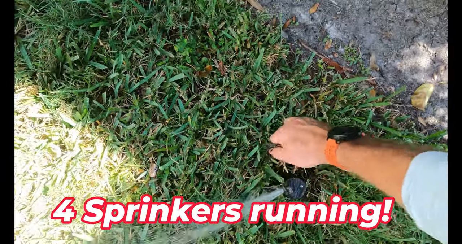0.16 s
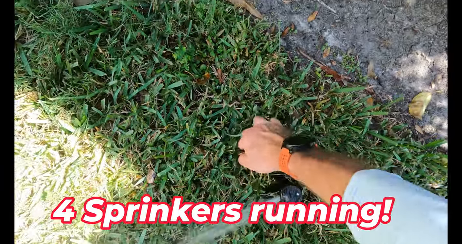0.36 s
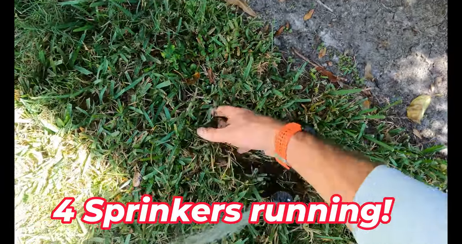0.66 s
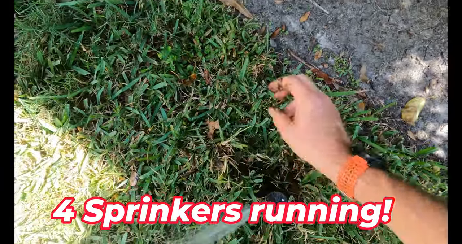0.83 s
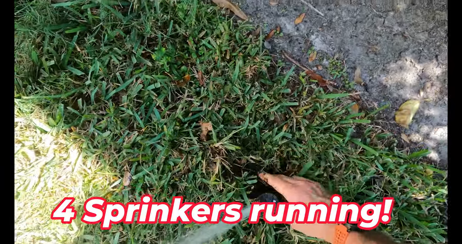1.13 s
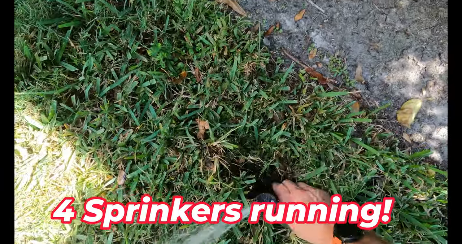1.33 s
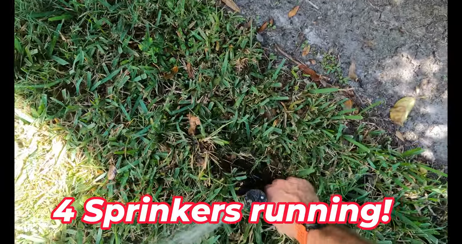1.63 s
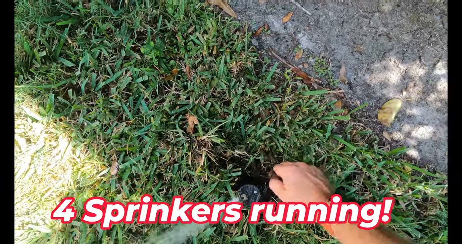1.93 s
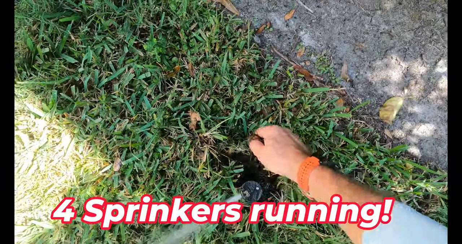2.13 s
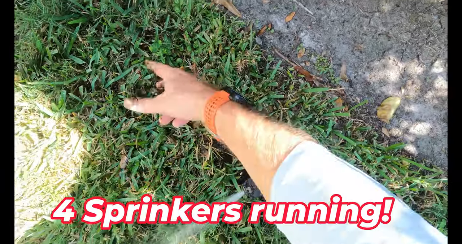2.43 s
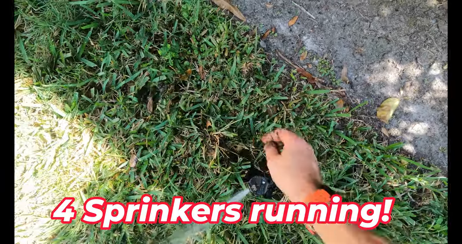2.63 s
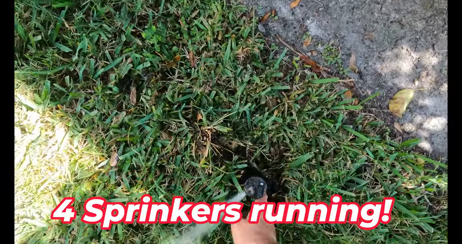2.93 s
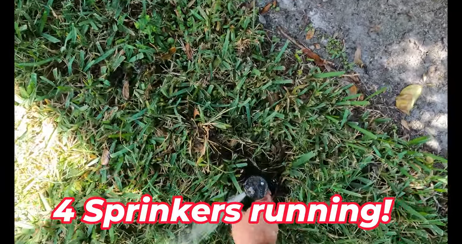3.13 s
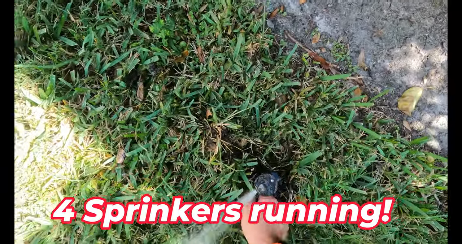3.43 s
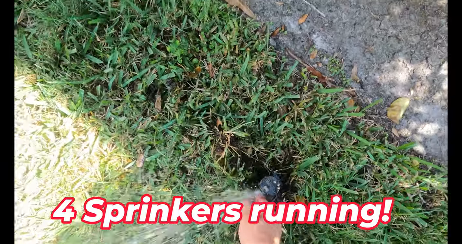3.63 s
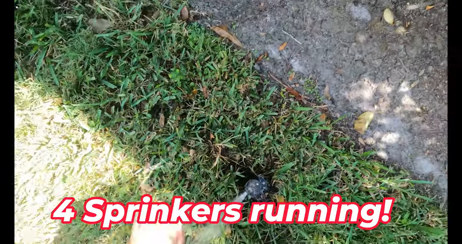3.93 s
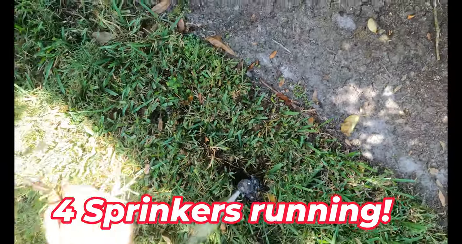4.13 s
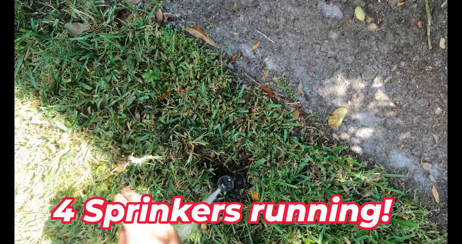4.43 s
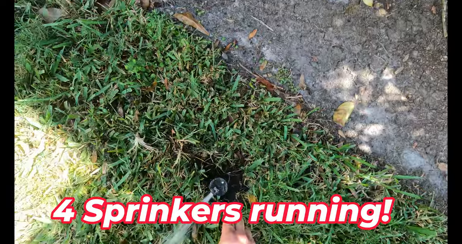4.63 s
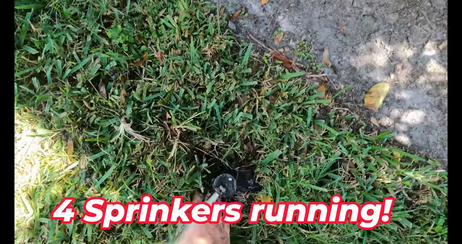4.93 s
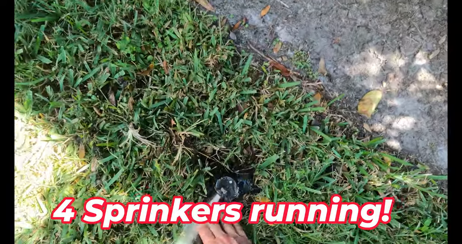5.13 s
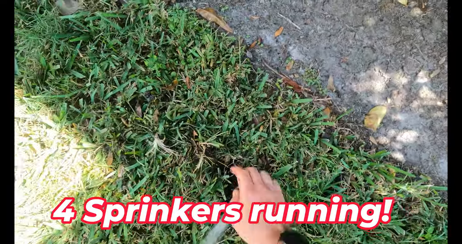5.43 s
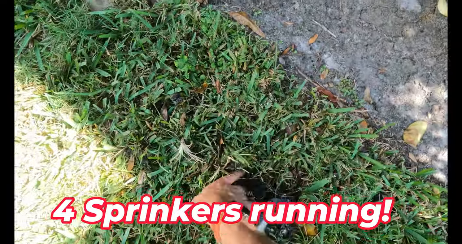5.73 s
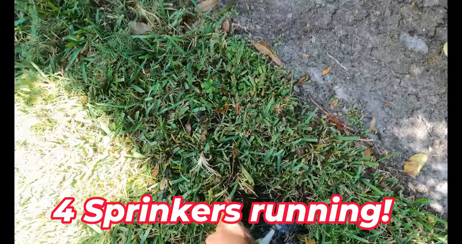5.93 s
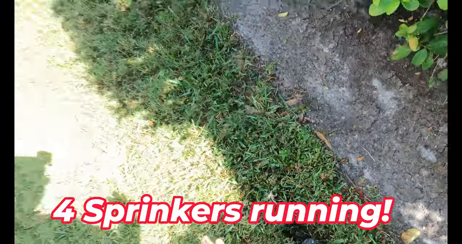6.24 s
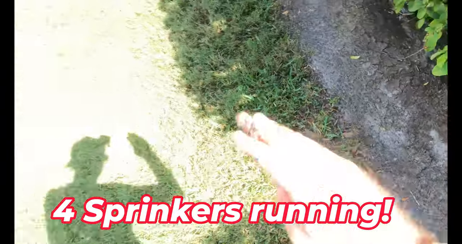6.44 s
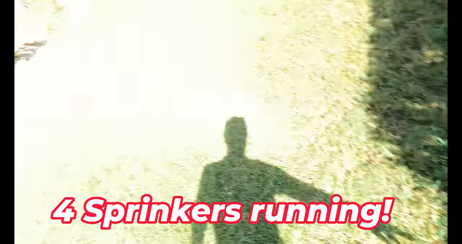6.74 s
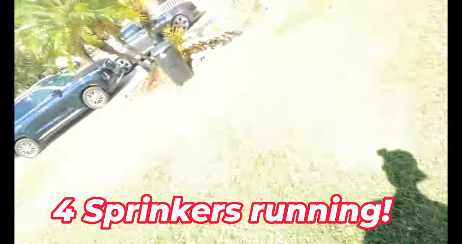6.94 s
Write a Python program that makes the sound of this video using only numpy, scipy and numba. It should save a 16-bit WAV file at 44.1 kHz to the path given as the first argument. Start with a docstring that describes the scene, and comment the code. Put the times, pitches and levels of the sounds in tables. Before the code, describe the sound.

Low traffic rumble and distant motor hum open the scene, with fingers ticking on a plastic sprinkler head and tiny water spits. A bright, crackly spray then bursts out and holds, wavering and splashing on the grass close by. It gulps and falters late, thins away to the soft street murmur, and rushes back just before the cut. Close, open-air microphone without room echo.

```python
"""A pop-up lawn sprinkler spits and then sprays against a hand and the grass, close by.
Dense droplet clicks come in bursts and ring five resonances about 2.4 kHz apart that shift as hand and head move.
Filtered clicks make heavier drops patter underneath; ticks of the plastic head are noise cracks with short rings.
Behind lie a wavering motor hum of sines, a traffic rumble that recedes and a street murmur, both coloured noise."""
import sys
import numpy as np
from scipy import signal
from scipy.fft import rfft, irfft
from scipy.io import wavfile
from scipy.ndimage import uniform_filter1d
from numba import njit

SR = 44100
rng = np.random.default_rng(int(sys.argv[2]) if len(sys.argv) > 2 else 0)


def dump_mix(stems):
    """Bounce the given channels to the path in sys.argv[1] as a 16-bit WAV at rate SR."""
    frames = np.atleast_2d(stems).T  # one column per channel
    limited = np.clip(frames, -1, 1)  # hard clip at full scale
    pcm = np.round(limited * 32767).astype(np.int16)
    wavfile.write(sys.argv[1], SR, pcm)


N = 311742


def undb(db):
    """Decibels to an amplitude factor."""
    return 10 ** (np.asarray(db) / 20)


def level(x, db):
    """Scale a signal to an RMS level in dB."""
    return x * undb(db) / np.sqrt(np.mean(x ** 2))


def curves(table):
    """Columns of a timed table after t/s, one value a sample."""
    s, *columns = np.transpose(table)
    return [np.interp(np.arange(N) / SR, s, column) for column in columns]


def over_hz(table):
    """A spectrum table read at every bin, straight on a log axis."""
    hz, value = np.transpose(table)
    bins_hz = np.arange(N // 2 + 1) * SR / N
    return np.interp(np.log(bins_hz + 1), np.log(hz + 1), value)


def coloured(table):
    """Noise with the given spectrum, at unit RMS."""
    spectrum = rfft(rng.standard_normal(N)) * undb(over_hz(table))
    return level(irfft(spectrum, N), 0)


@njit
def svf(x, hz, width):
    """State-variable band-pass with a moving centre and width, gain 1 at the centre."""
    y, band_state, low_state = np.empty(len(x)), 0., 0.
    for i in range(len(x)):
        g, damping = np.tan(np.pi * hz[i] / SR), width[i] / hz[i]
        v = (band_state + g * (x[i] - low_state)) / (1 + g * (g + damping))
        band_state = 2 * v - band_state
        low_state += 2 * g * v
        y[i] = damping * v
    return y


def band(x, hz, width_hz, count=2):
    """Resonance; the band-pass twice makes it steep."""
    for _ in range(count):
        x = svf(x, np.clip(hz + np.zeros(N), 20, SR / 3), width_hz + np.zeros(N))
    return x


def walk(rate):
    """Random levels held 1 / rate s and slewed twice; spread near 1."""
    hold = max(int(SR / rate), 2)
    steps = np.repeat(rng.standard_normal(N // hold + 1), hold)
    slewed = uniform_filter1d(uniform_filter1d(steps, hold), hold)
    return 1.3 * slewed[:N]


def flicker(rate):
    """A quick walk with its slow drift taken out."""
    quick = walk(rate)
    return quick - uniform_filter1d(quick, size=SR // 8)


def bumps(rows):
    """Bell-shaped swells or dips in dB from rows of time, height and length (at least 4 ms)."""
    t = np.arange(0, N, 32) / SR
    bells = sum(db * np.exp(-((t - s) / max(length, .004)) ** 2) for s, db, length in rows)
    return np.repeat(bells, 32)[:N]


def drops(rate, spread_db, mist_db):
    """Random clicks of unequal but bounded size over a fine mist of noise."""
    hit = rng.random(N) < rate / SR
    size = undb(spread_db * np.minimum(rng.exponential(size=N), 3.5))
    clicks = hit * size * np.sign(rng.standard_normal(N))
    mist = level(rng.standard_normal(N), mist_db)
    return level(level(clicks, 0) + mist, 0)


def yard():
    """Distant murmur of the street; its hiss rises and sinks as the head turns."""
    # spectrum of the murmur: f/Hz, density/dB per Hz
    murmur_tone = [(120, -73), (200, 3.5), (268, -4), (515, -18), (1380, -11.5), (2560, -19.5),
                   (4920, -13.5), (6130, -19.5), (12000, -18), (14400, -62), (15500, -39)]
    # swell of its hiss, above about 2 kHz: t/s, level/dB
    hiss_swell = [(0, -1), (1.5, 0.5), (2.5, -14), (5.3, 2.5), (6.2, -12), (6.5, -6.5), (6.8, -2),
                  (7.07, -16)]
    air = coloured(murmur_tone)
    low = signal.sosfilt(signal.butter(2, 2000, fs=SR, output="sos"), air)
    hiss = (air - low) * undb(curves(hiss_swell)[0] + 2.0 * flicker(30))
    return undb(-40.5) * (low + hiss)


def rumble():
    """Traffic rumble: coloured noise with separate deepest and upper bands."""
    # spectrum of the main rumble: f/Hz, density/dB per Hz
    main_tone = [(45, -43), (58, -1), (80, 2.5), (120, 0), (150, -10), (250, -19.5), (400, -46.5)]
    # main, deepest and upper parts, each: t/s, level/dB
    main_path = [(0.0, -27.5), (0.65, -24), (0.9, -30.5), (1.1, -26.5), (1.5, -26.5), (2.2, -34.5),
                 (2.5, -31.5), (4.0, -34.5), (6.3, -33), (7.07, -30.5)]
    deep_path = [(0.0, -30.5), (1.6, -35), (2.3, -47), (5.5, -43), (7.07, -36.5)]
    upper_path = [(0.0, -28.5), (0.2, -21), (0.6, -36), (1.4, -34), (2.2, -45), (7.07, -50.5)]
    main = coloured(main_tone) * undb(curves(main_path)[0] + 1.2 * walk(9))
    deep = level(band(rng.standard_normal(N), 38.0, 35), 0) * undb(curves(deep_path)[0])
    upper = level(band(rng.standard_normal(N), 149.2, 40.0), 0) * undb(curves(upper_path)[0])
    return main + deep + upper


def motor_hum():
    """Distant motor: sines share a wavering speed while each wavers alone in level."""
    # partials of the hum: f/Hz, RMS level/dB, before the wavering
    partials = [(37.7, -40.5), (76, -46.5), (113, -36.5), (150, -48.5)]
    turned_s = np.cumsum(1 + 0.01208 * walk(5)) / SR  # time stretched by the wavering speed
    return sum(np.sqrt(2) * undb(db + 1.5 * walk(6)) * np.sin(2 * np.pi * hz * turned_s) for hz, db in partials)


def ticks():
    """Fingers tick on the plastic head: a noise crack and a short ring of decaying sines."""
    # single ticks: t/s, relative level/dB, main ring f/Hz, 60 dB decay/s
    taps = [(0.0945, -30, 4600, .006), (0.0955, -17, 3740, 0.0079), (0.19, -26, 1690, 0.02),
            (0.1917, -29, 3320, 0.02), (0.196, -25, 2950, 0.014), (0.202, -29, 2610, .012),
            (0.212, -31, 3330, 0.023), (0.6855, -29, 2000, .008), (0.6905, -28, 1200, .008),
            (0.695, -26, 1390, 0.008), (0.701, -27, 1800, .012), (0.934, -28, 1700, .012),
            (0.963, -24, 900, 0.011), (0.7095, -23, 4900, 0.007), (0.7284, -10.5, 4800, 0.0053),
            (0.7293, -26, 1940, .025)]
    # partials of each ring: multiple of the main ring, level/dB
    ring_partials = [(1, 9.5), (.63, -14), (.35, 0), (1.4, -8)]
    rise_s, crack_s = 0.00027, 0.0015
    rings, cracks, u = np.zeros(N), np.zeros(N), np.arange(2000) / SR
    noises = rng.standard_normal((len(taps), len(u)))
    for (s, db, hz, t60), noise in zip(taps, noises):
        at = slice(int(s * SR), int(s * SR) + len(u))
        rise = 1 - np.exp(-u / rise_s)
        decay = np.exp(-np.log(1000) * u / t60)
        tone = sum(undb(g) * np.sin(2 * np.pi * ratio * hz * u) for ratio, g in ring_partials)
        rings[at] += undb(db - 8.0) * rise * tone * decay
        cracks[at] += undb(db + 2.5) * rise * noise * np.exp(-u / crack_s)
    return rings + band(cracks, 3000, 4600)


def patter(bursts):
    """Heavier drops thud dully on grass and skin; splashes swell the dull and the brighter part."""
    # flow of heavy drops: t/s, relative level/dB
    patter_path = [(0.0, -43), (1.6, -44.5), (1.66, -38), (1.85, -33.5), (2.1, -37), (3.6, -33), (3.8, -37),
                   (4.2, -34.5), (4.55, -46.5), (4.75, -35), (5.08, -37), (5.14, -41), (5.4, -50),
                   (5.47, -43), (5.6, -34), (6.08, -39), (6.14, -50), (6.34, -52), (6.45, -44.5),
                   (6.75, -42), (6.99, -41), (7.07, -35)]
    # splashes of heavier water: t/s, level above the patter/dB
    splash_rows = [(1.9, 5), (2.16, 4), (2.24, 5), (2.4, 3), (2.52, 4), (2.76, 5), (3.01, 5), (3.27, 7),
                   (3.36, 5), (3.46, 3), (3.66, 6), (3.95, 6), (4.18, 4), (4.26, 6), (4.78, 5), (4.98, 4),
                   (5.69, 6), (5.9, 3)]
    splash_s = 0.012
    thuds = drops(rate=1100, spread_db=2.5, mist_db=-6.5) * bursts
    splash_db = bumps([(s, db, splash_s) for s, db in splash_rows])
    dull = band(thuds, 340, 1100) * undb(splash_db)
    brighter = undb(-7.5) * band(thuds, 744, 1770) * undb(1.2 * splash_db)
    return (dull + brighter) * undb(curves(patter_path)[0] + 8.5 + 2.4 * flicker(30))


def spits():
    """Envelope of sudden gulps of water, rising within a millisecond and dying within a few."""
    # single spits: t/s, peak level/dB of this envelope
    gulps = [(0.393, -24), (0.5251, -21), (0.6764, -25), (0.7424, -28), (0.7546, -28), (0.8774, -24),
             (0.9907, -25), (1.0051, -20), (1.0154, -24), (1.044, -21), (1.062, -21), (1.0854, -27),
             (1.103, -25), (1.1154, -23), (1.1228, -17), (1.128, -17), (1.134, -16), (1.139, -22),
             (1.1554, -22), (1.1776, -20), (1.2344, -25), (1.2414, -20), (1.257, -19), (1.2624, -24),
             (1.2704, -24), (1.2824, -23), (1.2884, -25), (1.3044, -27), (1.312, -20), (1.3828, -26),
             (1.392, -23), (1.4, -21), (1.4046, -22), (1.5374, -27), (1.6217, -13), (5.1804, -12),
             (5.224, -5), (5.2624, -5), (5.3387, -18), (5.3497, -14), (5.3804, -14), (5.405, -10),
             (6.1642, -16), (6.1822, -20), (6.2126, -19), (6.232, -20), (6.2484, -17.5), (6.2828, -21),
             (6.3, -29), (6.321, -24), (6.3285, -21), (6.346, -21), (6.3822, -27), (6.4197, -24),
             (6.439, -25), (6.465, -25), (6.5, -37), (6.54, -38), (6.56, -32), (6.6075, -23), (6.646, -24),
             (6.6636, -24.5), (6.779, -26), (6.84, -30), (6.885, -26), (6.904, -18), (6.916, -17.5),
             (6.96, -13)]
    rise_s, fall_s = 0.00036, 0.002
    out, u = np.zeros(N + 2000), np.arange(2000) / SR
    shape = (1 - np.exp(-u / rise_s)) ** 2 * np.exp(-u / fall_s)
    for s, db in gulps:
        out[int(s * SR):int(s * SR) + len(u)] += undb(db) * shape / shape.max()
    return out[:N]


def reflect(x):
    """Short drifting echoes, and the hollows where reflections off ground and hand cancel the direct sound."""
    # nearby surfaces: delay/s, level/dB
    echoes = [(.00103, -15), (.0016, -16), (.0023, -16)]
    # moving hollows: t/s, four centres f/Hz, depth of the lower two (0-1)
    hollow_path = [(1.62, 3500, 6500, 8750, 10400, 0.17, .5), (1.8, 3280, 6480, 8680, 10400, 0.55, .7),
                   (2.0, 3550, 6400, 8600, 10400, .95, .7), (2.4, 3680, 6500, 8650, 10300, 0.57, .9),
                   (2.7, 3580, 6500, 8600, 10400, 0.41, 0.77), (3.04, 3700, 6500, 8950, 10400, 0.38, 0.74),
                   (3.14, 4650, 6700, 8550, 10400, 0.92, .7), (3.4, 4300, 6400, 8900, 10200, 1, 0.67),
                   (3.5, 4430, 6300, 9000, 10300, .8, .8), (3.57, 4300, 5500, 9050, 10300, 0.53, .7),
                   (3.74, 3230, 5750, 9000, 10900, .7, 0.79), (3.85, 3180, 6130, 8900, 10900, 0.87, 0.48),
                   (3.95, 3470, 6700, 8850, 10900, .8, 0.67), (4.05, 3640, 5800, 8700, 10700, 0.99, .7),
                   (4.2, 3600, 5540, 8650, 10500, .9, 0.7), (4.5, 3550, 5800, 8400, 10400, 0.61, 0.7),
                   (4.7, 3700, 6170, 8250, 10500, 0.57, 0.71), (5.08, 3600, 5940, 8100, 10700, .85, 0.95),
                   (5.13, 3000, 6140, 8600, 10800, .8, 0.43), (5.3, 2900, 6300, 8900, 10800, .9, .6),
                   (5.45, 3770, 5850, 8160, 10700, 0.5, .7), (5.58, 3600, 5900, 8400, 10300, 0.63, .35),
                   (5.78, 3570, 5950, 8500, 10300, 0.34, 1), (5.95, 3830, 5900, 8400, 10300, .5, 0.87),
                   (6.1, 3830, 5900, 8450, 11300, 0.66, 0.93), (7.0, 3500, 6000, 8600, 10700, 0.81, 0.23)]
    # the same four hollows: width/Hz
    hollow_widths = (500, 460, 546, 597)
    # the upper two hollows: depth (0-1)
    upper_depths = (0.45, 0.11)
    # finer hollows that only waver about a fixed place while the head holds still: f/Hz
    still_centres = (9200, 10200, 11450)
    # depth of the finer hollows: t/s, depth (0-1)
    still_path = [(1.6, 0.8), (2.8, .6), (3.1, .3), (3.6, 0.1), (3.8, .2), (4.1, .5), (4.5, .5), (4.7, .1),
                  (5.7, .3), (7.07, 0.2)]
    echo_drift_s, hollow_wander_hz, patchy = .00007, 45, .12
    n = np.arange(N)
    x = x + sum(undb(db) * np.interp(n - SR * (s + echo_drift_s * walk(2.08)), n, x) for s, db in echoes)
    *centres, first, second = curves(hollow_path)
    for hz, width, depth in zip(centres, hollow_widths, (first, second, *upper_depths)):
        depth = np.clip(depth + patchy * walk(13), 0, 1)  # comes and goes
        x = x - depth * band(x, hz + hollow_wander_hz * walk(8), width, count=1)
    still_depth = np.clip(curves(still_path)[0], 0, 1)
    for hz in still_centres:
        x = x - still_depth * band(x, hz + hollow_wander_hz * walk(4.6), 260, count=1)
    return x


def spray(bursts_db):
    """One stream of droplets rings all resonances; each also wanders and flickers alone."""
    # the jet: t/s, flow level/dB, second resonance f/Hz, relative level of first, second and fifth/dB
    jet_path = [(0.0, -55.5, 4830, -21, -13, 0), (0.8, -52.5, 4800, -9, -1, 5.5),
                (1.12, -47.5, 4950, -14, -2.5, 1), (1.46, -49.5, 5200, -16, -5, -3),
                (1.605, -48, 4830, 7.5, -2, -5), (1.63, -31, 5200, -9.5, -1, -7),
                (1.675, -25.5, 5200, -10, 0, -10), (1.71, -26.5, 5100, -7, 4, -7),
                (1.8, -27.5, 5460, -2, 4, -10), (1.93, -26.5, 5070, -6, 4, -10),
                (2.05, -28, 5000, -5, 2.5, -10), (2.35, -28, 4970, -2, 2.5, -8.5),
                (2.6, -27, 5140, -3, -2, -8), (2.8, -27, 4970, -4.5, 2, -9),
                (3.05, -28.5, 5200, -0.5, 3, -8), (3.1, -30, 4670, 1, 10, -7),
                (3.18, -27.5, 5300, 0, 1.5, -6), (3.3, -28.5, 5800, 2.5, 3, -10),
                (3.5, -29, 4870, 0, 3.5, -4), (3.64, -28.5, 5060, 1.5, 2, -6),
                (3.69, -29, 4530, 5.5, 3, -2), (3.74, -33, 4230, 3, 8.5, -5),
                (3.79, -26.5, 4460, -4, 5.5, -18), (3.83, -25, 4370, -16, 5, -24),
                (3.84, -33.5, 4400, 2, 4, -5), (3.92, -27.5, 4340, -4, 0, -8),
                (4.0, -27.5, 4780, -2, 4.5, -5.5), (4.13, -27, 4850, -2.5, 0, -9),
                (4.4, -28.5, 4800, 0, 3, -7.5), (4.58, -27, 4770, -6, 3, -6),
                (4.7, -25.5, 4730, -6.5, 2.5, -10.5), (5.07, -30, 4940, 3, 5, -6),
                (5.11, -26.5, 5000, -6, -2, -7), (5.13, -24.5, 5400, -5, -1, -14),
                (5.16, -27, 5440, -10, 3, -7), (5.19, -27, 4800, -9, 1, -10), (5.22, -28, 4100, -20, 1, -9),
                (5.25, -27.5, 4040, -24, -5, -13), (5.3, -28.5, 4960, -30, 4.5, -3.5),
                (5.37, -34, 4740, -14, -0.5, -5), (5.43, -42, 4470, -3, -6, -6),
                (5.455, -24.5, 4700, -7, 4.5, -11), (5.55, -25.5, 4950, -3.5, 2.5, -11),
                (5.66, -26.5, 4720, -5.5, 2, -8), (5.76, -31.5, 4800, -1.5, 4.5, -5),
                (5.85, -30.5, 5060, -1, 10.5, -5), (5.92, -34, 5250, 2, 9.5, -5),
                (6.0, -32.5, 5050, 0, 7, 1), (6.11, -36, 4970, 1, 14.5, 0), (6.125, -35, 4900, -7.5, 0, -4),
                (6.2, -39.5, 4900, -7.5, 5, -4), (6.27, -42.5, 4870, -12, 2, -2),
                (6.35, -47, 4900, -4, 1.5, -3), (6.5, -51.5, 5260, -5, -0.5, -5),
                (6.87, -50, 5100, -3, -3, 1), (6.92, -37.5, 5000, -6, 0, -3),
                (6.97, -32, 4850, -2.5, -1.5, -8), (7.02, -27, 4900, 0, -4, -8),
                (7.07, -29, 4900, 4, 2, -4)]
    # t/s, first, third and fourth resonance f/Hz, relative level of fourth/dB, breadth of all (factor)
    centre_path = [(0.0, 2500, 7340, 9400, -3, 1.1), (1.1, 2620, 7740, 9750, -8, 1),
                   (1.6, 2580, 7600, 10000, -7, 1.7), (2.0, 2400, 7650, 9750, -7, 1.47),
                   (2.5, 2770, 7550, 9750, -6, 1.13), (3.0, 2700, 8030, 9800, -8, 1.2),
                   (3.2, 2950, 7900, 9860, -7.5, 1.3), (3.58, 2650, 7950, 9750, -5, 1.3),
                   (3.68, 2600, 7300, 9050, -4, 1.8), (3.76, 2470, 6500, 8600, 0.5, 1.1),
                   (3.83, 2460, 7000, 8800, -10, 1.2), (3.93, 2500, 7270, 9350, -8.5, 0.89),
                   (4.5, 2600, 7500, 9500, -8, 0.69), (5.05, 2480, 7770, 9900, -10, 1.1),
                   (5.11, 2600, 7500, 9050, -1, 1.7), (5.145, 2600, 6900, 8600, -5, 1.8),
                   (5.175, 2600, 8300, 9400, -6, 1.8), (5.2, 2700, 7800, 9900, -9, 1.16),
                   (5.29, 2820, 8000, 10400, -14, 0.96), (5.42, 2600, 7100, 9050, -7.5, 1.1),
                   (5.46, 2580, 7200, 9000, 0, 1.03), (5.55, 2600, 7550, 9500, -8, 0.62),
                   (5.8, 2600, 7600, 9700, -4, 0.85), (5.9, 2720, 7100, 9100, 0, 0.96),
                   (6.05, 2880, 7640, 9100, -0.5, 0.87), (6.2, 2540, 7100, 9200, -1, 1.2),
                   (7.07, 2620, 7170, 9400, -2.5, 0.59)]
    # five resonances: width/Hz, before the breadth factor
    widths = (2150, 2080, 2180, 1870, 2650)
    # the jet falters or surges briefly: t/s, level/dB, length/s
    falters = [(1.64, -2.5, .008), (1.685, -9, 0.0066), (1.9, -2.5, 0.0053), (1.93, -7.5, 0.0076),
               (2.255, -10.5, 0.0049), (2.67, -13, 0.0042), (3.69, -6, 0.0084), (3.875, -12, 0.0041),
               (3.98, -7, 0.0048), (4.05, -10.5, 0.0048), (4.14, 10, 0.0036), (4.59, -6.5, 0.054),
               (5.155, -2, .012), (5.21, -4, 0.013), (5.29, -3, .012), (5.335, -9, .012), (5.38, -4, 0.012),
               (5.25, 1.5, 0.016), (5.73, -0.5, .04)]
    # the hand crosses the jet and the wandering changes: t/s, gain of wander/dB, length/s
    hand_rows = [(3.8, -3, 0.089), (5.22, 9, 0.2), (6.3, 11, 0.27)]
    fifth_hz, core_hz, core_db = 11760, 634, -6  # the core is a narrower crest on each resonance
    wander_hz, crest_wander_hz = 96, 179
    full_flow_db, sputter = -34, .16  # sputter dB for each dB the flow lies below full

    flow_db, second_hz, first, second, fifth = curves(jet_path)
    first_hz, third_hz, fourth_hz, fourth, breadth = curves(centre_path)
    centres = (first_hz, second_hz, third_hz, fourth_hz, fifth_hz)
    levels = (first, second, 0, fourth, fifth)
    swerve = undb(bumps(hand_rows))

    weak_db = np.clip(full_flow_db - flow_db, 0, 20)
    clicks = drops(rate=3500, spread_db=4.0, mist_db=0.5) * undb(bursts_db)
    stream = level(clicks, 0) * undb(flow_db + bumps(falters) + sputter * weak_db * flicker(90))
    stream = stream + undb(-11.5) * spits() * np.sign(rng.standard_normal(N))

    out = 0
    for k, (hz, width, rel_db) in enumerate(zip(centres, widths, levels)):
        hz = hz + wander_hz * swerve * walk(20)
        broad = band(stream, hz, width * breadth)
        crest = band(stream, hz + crest_wander_hz * walk(5.9), core_hz, count=1)
        ring = broad + undb(core_db) * crest
        gain = undb(rel_db + 0.63 * swerve * walk(25) + 1.39 * flicker(35))
        # every other resonance is flipped, so neighbours add up between their centres;
        # the root makes up for the power a band loses
        out = out + (-1) ** k * gain * np.sqrt(SR / (2 * width)) * ring
    return reflect(out)


def clumps():
    """Burst level in dB: the jet breaks into clumps milliseconds long, its flow more even over longer spans."""
    clumps_db = 1.2 * walk(300) + 3.2 * walk(800)
    slow_db = uniform_filter1d(clumps_db, size=300)
    return clumps_db - .7 * slow_db + 1.1 * flicker(30)


def water():
    """Spray and patter share their bursts; a moving hollow parts the dull drops from the hiss."""
    # hollow between patter and hiss: t/s, centre f/Hz, depth (0-1)
    gap_path = [(0, 1330, 0.2), (3.6, 1300, 0.23), (3.8, 1230, 0.77), (5.0, 1210, 0.3), (6.1, 1280, 0.54),
                (6.6, 1300, 0)]
    bursts_db = clumps()
    wet = spray(bursts_db) + patter(undb(bursts_db))
    gap_hz, depth = curves(gap_path)
    return wet - np.clip(depth, 0, 1) * band(wet, gap_hz, 370, count=1)


def scene():
    """Street, traffic and motor behind the ticks and the water, the same on both sides."""
    mono = yard() + rumble() + motor_hum() + ticks() + water()
    return np.array([mono, mono])


def record(dry):
    """Peaks are rounded; two close ports differ in phase and colour, sound sways between them; the top is cut."""
    # phase between the ports: f/Hz, left lead/rad
    port_phase = [(40, .08), (150, .06), (520, .15), (2760, -.65), (5000, -.25), (6460, -.4), (9500, -.1),
                  (12300, .2), (14100, 2)]
    # balance of the ports: f/Hz, left minus right level/dB
    port_balance = [(60, -.5), (200, -1), (380, -1.5), (700, -1), (1400, -1), (2800, -3.3), (4600, -.7),
                    (9000, 0), (11500, -1), (13000, -3.4)]
    # sound swaying quickly between the ports, the bass more slowly: f/Hz, level/dB
    port_sway = [(40, -25), (100, -33), (200, -28), (400, -25), (700, -16), (1500, -13), (2500, -13),
                 (4500, -17), (9000, -18), (11500, -9), (12500, -3), (13500, -2), (15000, -3)]
    # colour of both ports: f/Hz, level/dB
    mic_tone = [(12500, -0.5), (14000, 5), (14800, 0.5), (15300, -22)]
    dry, sign = .3 * np.tanh(dry / .3), np.array([[1], [-1]])
    bass = signal.sosfilt(signal.butter(4, 280, fs=SR, output="sos"), dry)
    # random sway, added to one port and taken from the other
    swayed = bass * walk(30) + (dry - bass) * walk(900)
    sway = rfft(swayed) * undb(over_hz(port_sway))
    ports = undb(sign * over_hz(port_balance) / 2) * np.exp(1j * sign * over_hz(port_phase) / 2)
    wet = irfft((rfft(dry) * ports + sign * sway) * undb(over_hz(mic_tone)), N)
    return signal.sosfilt(signal.ellip(10, .2, 70, 15600, fs=SR, output="sos"), wet)


dry = scene()
out = record(dry)
dump_mix(out)
```